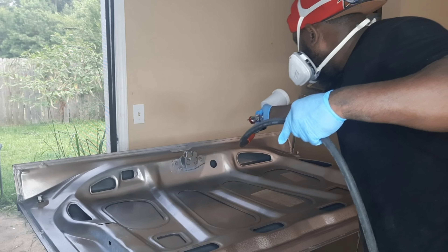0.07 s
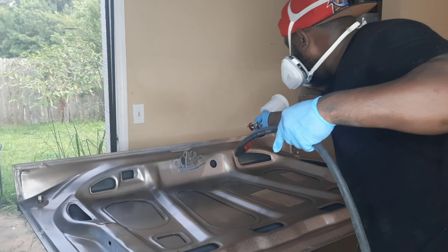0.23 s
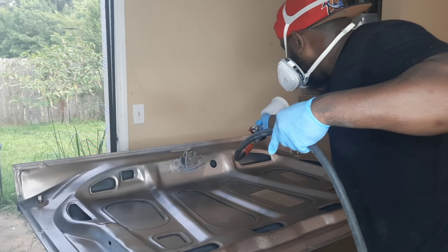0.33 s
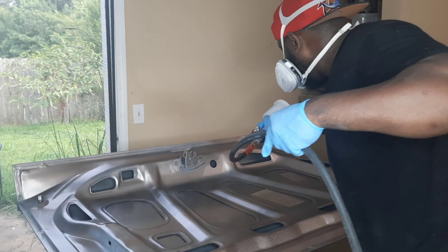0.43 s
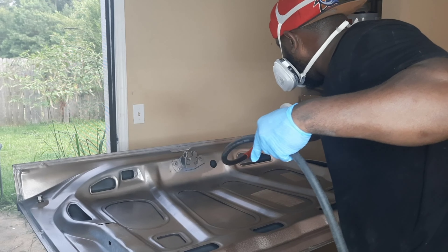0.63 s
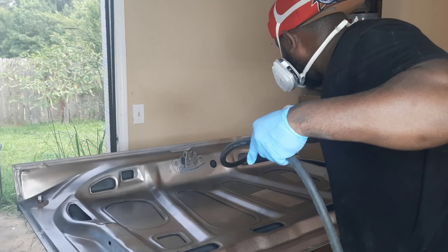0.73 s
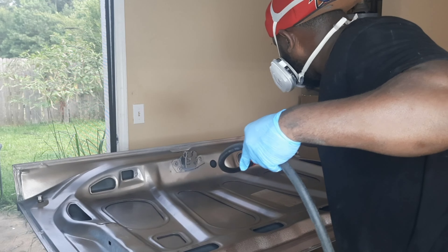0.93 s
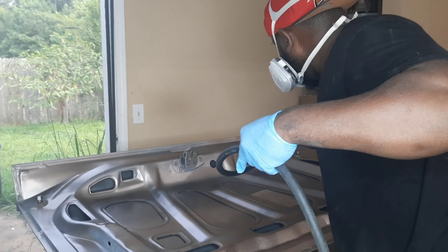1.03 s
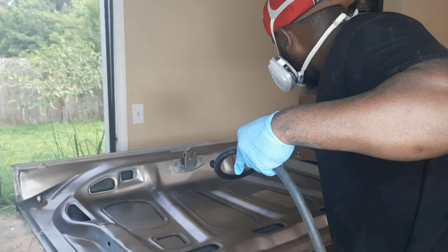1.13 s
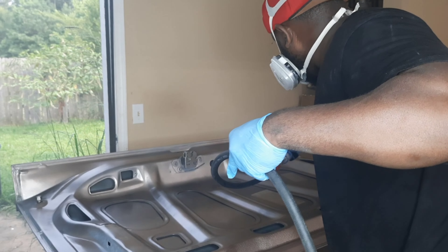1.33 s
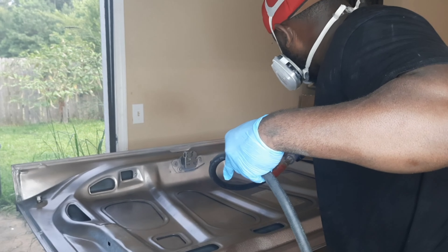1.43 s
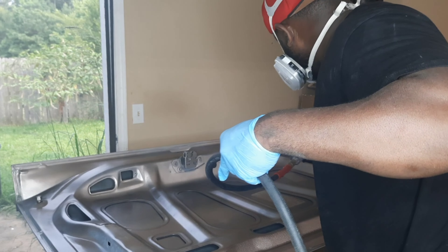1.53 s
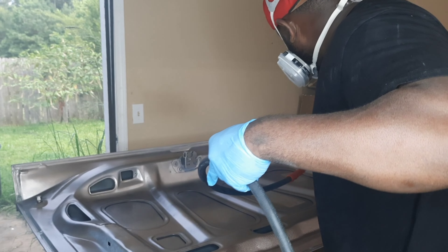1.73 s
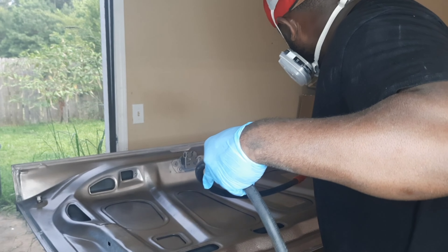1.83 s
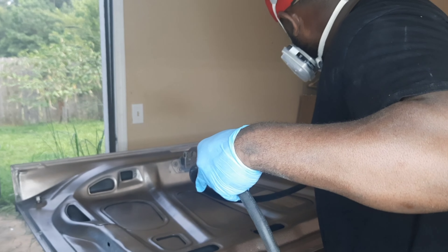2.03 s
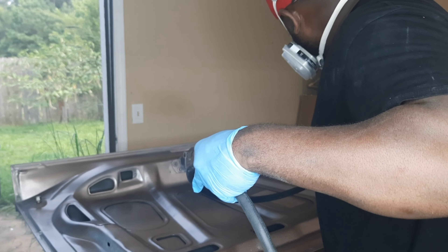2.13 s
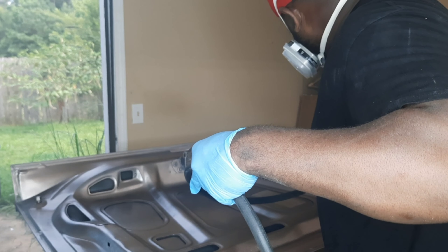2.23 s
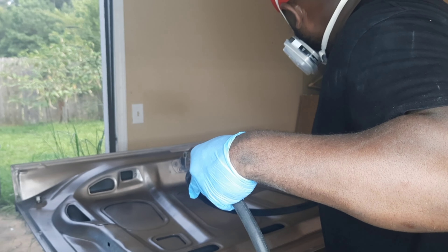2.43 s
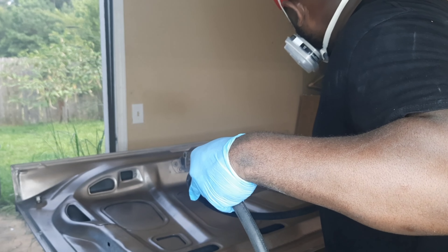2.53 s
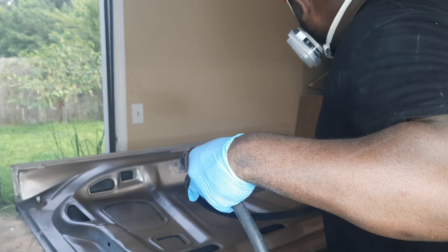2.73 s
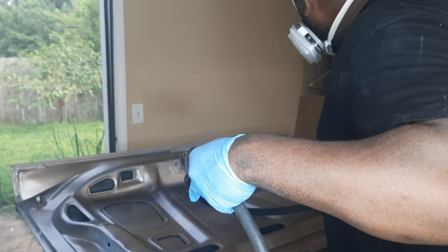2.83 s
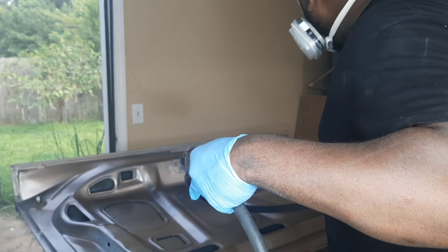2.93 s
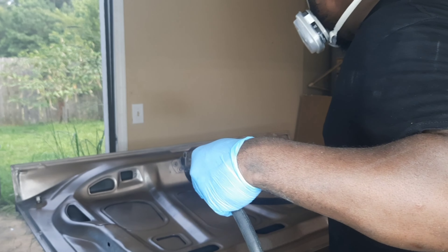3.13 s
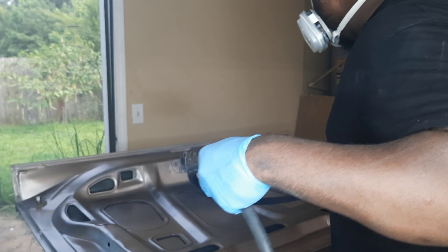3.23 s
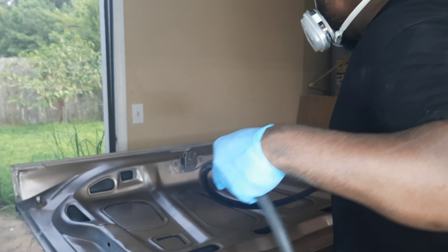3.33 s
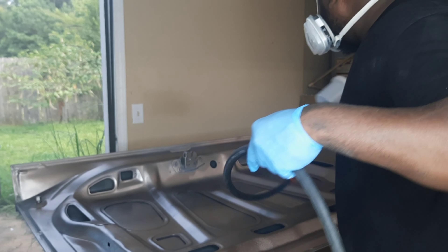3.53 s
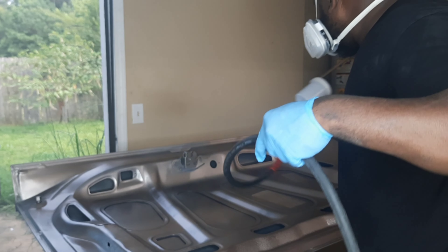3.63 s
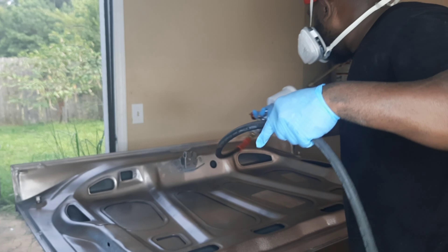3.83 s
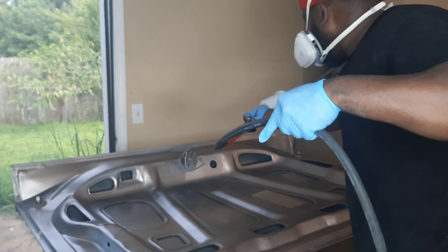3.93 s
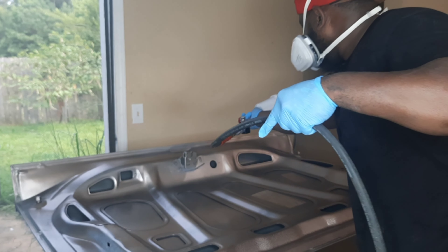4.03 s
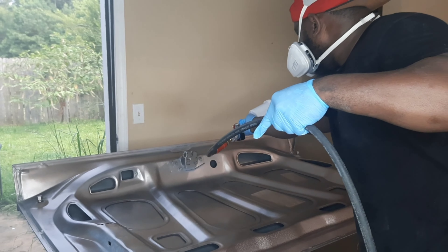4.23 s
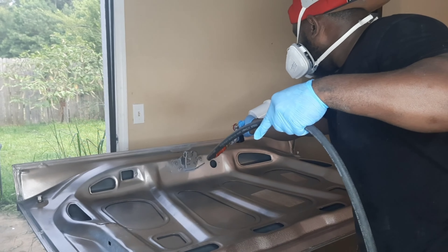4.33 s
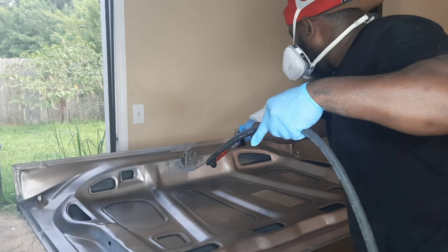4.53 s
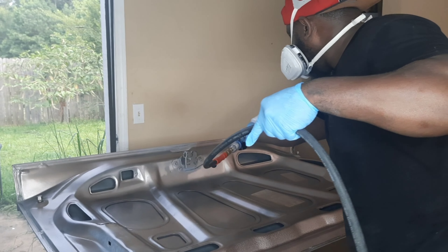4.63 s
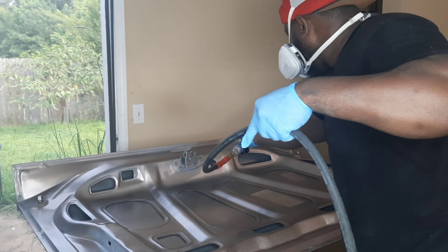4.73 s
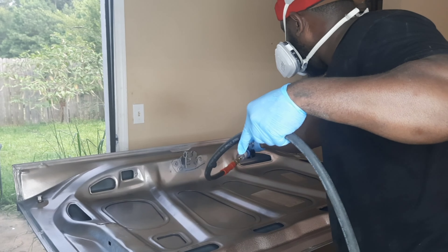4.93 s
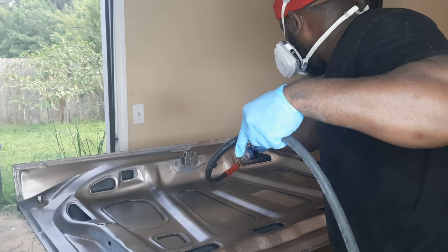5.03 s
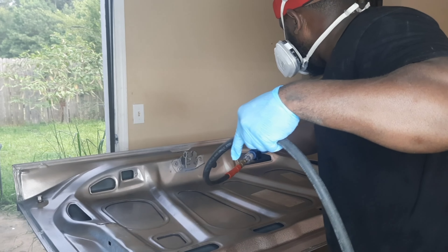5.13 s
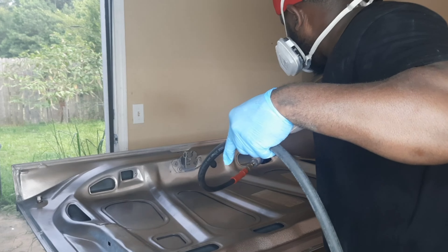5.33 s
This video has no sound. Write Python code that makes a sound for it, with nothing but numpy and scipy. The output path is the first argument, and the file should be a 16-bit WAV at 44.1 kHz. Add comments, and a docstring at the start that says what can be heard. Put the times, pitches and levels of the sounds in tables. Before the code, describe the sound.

Two spells of thin paint spray hiss sit over the dense, ringing hum of a running air compressor in a workshop.

```python
"""A dense, ringing drone over a rush of air fills a garage, and a spray gun is already hissing.
The drone is an air compressor at constant speed, with two piston strokes a turn and a swishing belt.
The gun makes two passes of paint; the second opens with a sharp spurt of stored air.
An automatic gain control turns the sound down under the spurt and creeps back a second later."""
import sys
import numpy as np
from scipy import signal
from scipy.fft import rfft, irfft, next_fast_len
from scipy.io import wavfile
from scipy.ndimage import uniform_filter1d, minimum_filter1d

SR = 44100
rng = np.random.default_rng(int(sys.argv[2]) if len(sys.argv) > 2 else 0)


def dump_mix(stems):
    """Bounce the given channels to the path in sys.argv[1] as a 16-bit WAV at rate SR."""
    frames = np.atleast_2d(stems).T  # one column per channel
    limited = np.clip(frames, -1, 1)  # hard clip at full scale
    pcm = np.round(limited * 32767).astype(np.int16)
    wavfile.write(sys.argv[1], SR, pcm)


N = 429975
T = np.arange(N) / SR
TURN_HZ, CUTOFF_HZ = 19.6135, 15800  # crank turns a second; top of the treble


def from_db(db):
    """Turn decibels into a number to multiply the sound by."""
    return 10 ** (np.asarray(db) / 20)


def at_hz(table, hz, column=1):
    """Read a table at any pitch, sliding smoothly from row to row."""
    table = np.array(table)
    return np.interp(np.log(np.maximum(hz, 1)), np.log(table[:, 0]), table[:, column])


def pan(balance_db):
    """Share the same power between left and right; a positive balance leans left."""
    gains = from_db(np.array([balance_db, -balance_db]) / 2)
    return gains / np.sqrt(np.mean(gains ** 2, axis=0))


def drift(rate_hz):
    """A slow random wander, mostly between -1 and 1."""
    keep = np.exp(-80 * np.pi * rate_hz / SR)
    slow = signal.lfilter([1], [1, -2 * keep, keep * keep], rng.standard_normal(N // 40 + 2002))[2000:]
    return np.interp(np.arange(N) / 40, np.arange(len(slow)), slow / slow.std())


def body_ring(hz):
    """Pump, tank and room ring: each tone's boost, balance, delay and share left free of the ringing."""
    # where they ring: pitch_hz, width_hz, boost_db, balance_db, left_delay_rad
    rings = [(348.3, 77, 16, 1, 0.08), (490.2, 44.5, 15, 9, 0.23), (706.5, 17, 5, -16, -1.5),
             (746, 29, 8.5, 2, 1.03), (796.3, 28, 10, -3, 1.6), (892, 30.9, 19, 2, -0.2),
             (957.3, 27.6, 15, 9.5, 1.0), (980.7, 13, 12, 16, -1.5), (1059, 12, 5, 7, 2.5),
             (1235, 18, 9, 5, 2.5), (1275, 11, 4.5, -4.5, 1.4), (1314, 14, 8, 1.5, 2.5),
             (1510, 15, 8, 9, -1.6), (1676, 75, 9.5, 4, 1.15), (1887.7, 30, 12.5, 12, 0.2),
             (2306, 78, 7, 0, 0), (2527, 17.6, 13.5, 5, -0.3)]
    centre, width, boost_db, balance_db, delay_rad = np.transpose(rings)
    near = 1 / (1 + (2 * (hz[:, None] - centre) / width) ** 2) ** 2
    held = near / np.maximum(near.sum(axis=1, keepdims=True), 1)
    return near @ boost_db, held @ balance_db, held @ delay_rad, 1 - held.sum(axis=1)


def even_strokes(tones, hz, size, rounds=8):
    """The pistons pump equally hard and the room smears them: shift tones until a turn is two swells."""
    # how deeply the strokes make each range throb: low_hz, high_hz, swing_db
    throb = [(250, 420, 1.5), (420, 800, 0.5), (800, 1050, 4.0), (1050, 2000, 1.0)]
    stroke = np.cos(4 * np.pi * np.arange(size) / size)
    for low, high, swing_db in throb * rounds:
        inside = (hz > low) & (hz < high)
        wave = irfft(tones * inside, size)
        power = uniform_filter1d(np.sum(wave ** 2, axis=0), size=size // 10, mode="wrap")
        even = rfft(wave * from_db(swing_db * stroke) / np.sqrt(power))[:, :len(hz)]
        shift = np.angle(np.sum(even * np.conj(tones), axis=0)) * inside
        tones = tones * np.exp(1j * shift)
    return tones


def repeat_turn(tones, turns, size):
    """Add the tones into one turn of the crank and play it round and round."""
    one_turn = irfft(tones, size) * size / np.sqrt(2)
    return np.array([np.interp(turns, np.arange(size) / size, side, period=1) for side in one_turn])


def piston_drone(turns, stroke_fall_db, scatter_db, scatter_rad, echo_db, size=16384):
    """Every turn repeats the same clatter: two fading valve blows that set pump, tank and room ringing."""
    # strength of the pump's tones before the ringing: pitch_hz, level_db
    tone_levels = [(60, -62.5), (80, -47), (150, -49), (196, -66), (280, -49), (430, -53), (630, -45),
                   (1130, -45), (1450, -44.5), (1560, -55), (2570, -57), (3000, -69.5), (4000, -64.5),
                   (5300, -71.5), (15000, -75)]
    # the pistons nearly match, so odd multiples of the crank speed are weak in the bass: pitch_hz, cut_db
    odd_cut = [(100, 21), (350, 15), (450, 3.5), (700, 5), (840, 3.5), (885, -0.5)]
    # where the drone sits between the ringing pitches: pitch_hz, balance_db
    drone_balance = [(100, -2.5), (300, 4.5), (800, 2.5), (1200, 4.5), (2500, 3.5)]
    multiple = np.arange(int(CUTOFF_HZ / TURN_HZ))
    hz = multiple * TURN_HZ
    since_blow = (2 * np.arange(size) / size) % 1
    clatter = rfft(rng.standard_normal(size) * from_db(-stroke_fall_db * since_blow))[multiple]
    boost_db, balance_db, delay_rad, free = body_ring(hz)
    level_db = at_hz(tone_levels, hz) - multiple % 2 * at_hz(odd_cut, hz) + boost_db
    balance_db = balance_db + free * at_hz(drone_balance, hz)
    delay_rad = delay_rad + free * 2 * np.pi * hz * 0.000304  # the pump reaches the left side later
    # standing waves in the room make each tone louder or softer, differently on each side
    room_share = np.minimum(hz / 1460, 1)
    chance = rng.uniform(-1.04, 1, (3, len(hz))) * free * room_share
    level_db = level_db + scatter_db * chance[0]
    balance_db = balance_db + scatter_db * chance[1]
    phase = np.angle(clatter) - np.outer([1, 0], delay_rad + scatter_rad * chance[2])
    tones = from_db(level_db) * pan(balance_db) * np.exp(1j * phase) * (multiple > 1)
    tones = even_strokes(tones, hz, size)
    # an echo off the moving painter makes single tones swell and fade
    echo = tones * room_share * np.exp(2j * np.pi * rng.random(tones.shape)) * from_db(echo_db)
    return repeat_turn(tones, turns, size) + repeat_turn(echo, turns, size) * drift(0.24)


def microphones(pair, hz):
    """Two unrelated noises become left and right: alike in the bass, the left a little late."""
    # how alike the two sides hear the room: pitch_hz, likeness (0 to 1), left_delay_rad
    likeness = [(80, 0.66, .1), (300, 0.73, 0.26), (520, 0.78, 0.74), (970, 0.05, 2.2), (1230, 0, 3.2),
                (1590, 0.03, 2.47), (2400, 0.09, 6.28), (5000, 0.02, 6.14)]
    alike = np.clip(at_hz(likeness, hz), 0, 1)
    mid, side = np.sqrt((1 + alike) / 2) * pair[0], np.sqrt((1 - alike) / 2) * pair[1]
    return np.array([(mid + side) * np.exp(-1j * at_hz(likeness, hz, column=2)), mid - side])


def air_noise(colour, rings=()):
    """Swirling air: steady stereo noise shaped by a table and boosted wherever something rings."""
    size = next_fast_len(N, real=True)
    hz = np.arange(size // 2 + 1) * SR / size
    boost_db = sum(boost / (1 + (2 * (hz - centre) / width) ** 2) for centre, width, boost in rings)
    white = microphones(rfft(rng.standard_normal((2, size))), hz) * np.sqrt(SR / 2)
    shaped = white * from_db(at_hz(colour, hz) + boost_db) * pan(at_hz(colour, hz, column=2))
    return irfft(shaped, size)[:, :N]


def compressor(drone_db, rush_db, wobble_s, unsteady_db, chuff_db):
    """The pistons drone as the crank wobbles very slightly; the rush of air swells with each stroke."""
    # air rushing through the pump: pitch_hz, level_db, balance_db
    rush = [(20, -99, 0), (73, -70, -1), (205, -73.5, 1), (316, -63.5, 0.5), (556, -67, 5.5), (895, -63, 4),
            (1350, -66, 4), (1730, -68.5, -2), (2380, -67.5, 2), (3240, -76, -2), (4300, -74.5, -1.5),
            (5550, -77.5, -6.5), (6700, -75, -3.5), (8550, -76.5, -2.5), (9800, -77.5, 9), (11300, -80, 3),
            (15000, -86, -2)]
    # the rush makes tank, room and air line ring: pitch_hz, width_hz, boost_db
    hollows = [(174, 20, 4), (237.4, 8.8, 15.5), (320, 9.3, 5.5), (498, 23, 8.5), (1324, 190, 3),
               (2330, 48, 6), (2520, 45, 3.5), (6380, 54, 4.5), (8030, 70, 4.5), (8480, 220, 5),
               (9645, 67, 11), (10300, 120, 6), (13840, 30, 15)]
    turns = TURN_HZ * (T + wobble_s * drift(7))
    drone = piston_drone(turns, stroke_fall_db=8.5, scatter_db=7, scatter_rad=1.59, echo_db=-21)
    drone = drone * from_db(drone_db + unsteady_db * drift(7.7))
    swell_db = chuff_db * np.sin(4 * np.pi * turns)
    return drone + air_noise(rush, hollows) * from_db(rush_db + swell_db)


def drive_belt(lap_hz, first_swish_s, swish_db, uneven_db):
    """A faint swish comes round with every lap of the belt, never quite equally loud."""
    # the belt's swish: pitch_hz, level_db, balance_db
    swish = [(1500, -100, -4), (2870, -76.5, 7), (3900, -75.5, 0), (4800, -79, -2), (6500, -92, 9),
             (9000, -82, 2), (13000, -100, 0)]
    lap = abs(np.cos(np.pi * lap_hz * (T - first_swish_s)))
    return air_noise(swish) * lap * from_db(swish_db + uneven_db * drift(4.6))


def spray_gun(valve_s, flutter_db, spurt_db, spurt_rise_s, spurt_fade_s):
    """The paint hisses while the trigger is held; pressure built up in the pause escapes first."""
    # pulls of the trigger: start_s, end_s, start_db, end_db
    passes = [(-0.2, 2.79, 0, -0.5), (3.998, 7.23, 1, -1.8)]
    # hiss of air breaking paint into a fan of mist: pitch_hz, level_db, balance_db
    mist = [(3040, -78.5, 10), (5070, -79, 0), (6900, -77.5, -1), (9500, -81, 4), (10400, -78.5, 9),
            (11600, -76.5, 5), (13200, -72, 3), (15400, -77, 1)]
    # spurt of stored air as the valve opens: pitch_hz, level_db, balance_db
    spurt = [(1000, -86, 2), (3000, -67.5, 3), (5030, -64, -2), (8500, -59, -4), (9000, -64.5, 5),
             (13500, -55, 4), (15500, -58, 3)]
    flow = 0
    for start_s, end_s, start_db, end_db in passes:
        valve = np.clip((T - start_s) / valve_s, 0, 1) * np.clip((end_s - T) / valve_s, 0, 1)
        flow = flow + valve * from_db(np.interp(T, [start_s, end_s], [start_db, end_db]))
    hiss = air_noise(mist) * flow * from_db(flutter_db * drift(7.2))
    since_second_pull = np.maximum(T - passes[1][0], 0)
    rise = np.minimum(since_second_pull / spurt_rise_s, 1) ** 2
    fade = from_db(-60 * since_second_pull / spurt_fade_s)
    return hiss + air_noise(spurt) * rise * fade * from_db(spurt_db)


def gain_control(sound, threshold_db, depth_db, start_db, hold_s, release_db_per_s, attack_s):
    """Bright peaks turn the volume down fast; it waits, then creeps back. It starts out turned down."""
    treble = np.mean(np.diff(sound, prepend=0) ** 2, axis=0)
    treble_db = 10 * np.log10(np.maximum(uniform_filter1d(treble, size=256), 0) + 1e-12)
    cut_db = np.clip(treble_db - threshold_db, 0, depth_db)
    cut_db[0] = start_db
    hold = 2 * int(hold_s * SR / 2) + 1
    held_db = -minimum_filter1d(-cut_db, hold, origin=hold // 2, mode="nearest")  # deepest recent cut
    released_db = np.maximum.accumulate(held_db + release_db_per_s * T) - release_db_per_s * T
    keep = np.exp(-1 / (attack_s * SR))
    smooth_db, _ = signal.lfilter([1 - keep], [1, -keep], released_db, zi=[keep * start_db])
    return sound * from_db(-smooth_db)


def scene():
    """The compressor, its belt and the spray gun together."""
    pump = compressor(drone_db=0.37, rush_db=-0.5, wobble_s=0.000012, unsteady_db=0.1, chuff_db=-0.4)
    belt = drive_belt(lap_hz=2.265, first_swish_s=0.106, swish_db=0.5, uneven_db=1.4)
    gun = spray_gun(valve_s=0.05, flutter_db=0.1, spurt_db=5, spurt_rise_s=0.0094, spurt_fade_s=0.31)
    return pump + belt + gun


def record(dry):
    """Apply the gain control, then cut off the highest treble."""
    levelled = gain_control(dry, threshold_db=-27.5, depth_db=2.5, start_db=3.0,
                            hold_s=0.94, release_db_per_s=7.5, attack_s=0.0057)
    return signal.sosfilt(signal.ellip(12, 0.1, 80, CUTOFF_HZ, fs=SR, output="sos"), levelled)


dry = scene()
out = record(dry)
dump_mix(out)
```